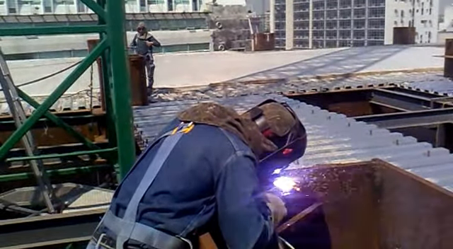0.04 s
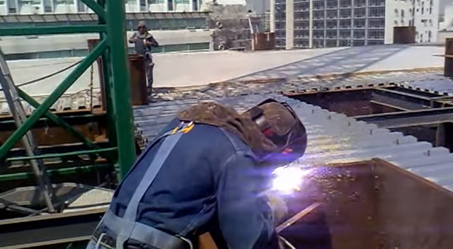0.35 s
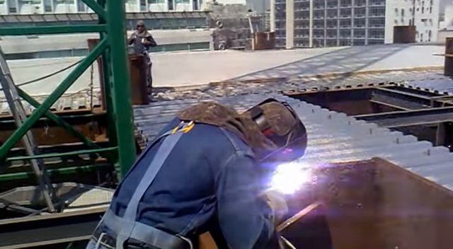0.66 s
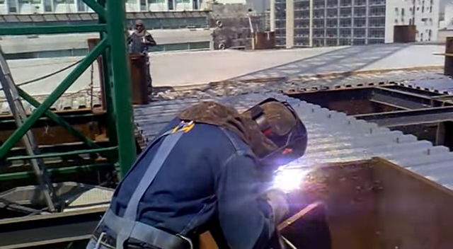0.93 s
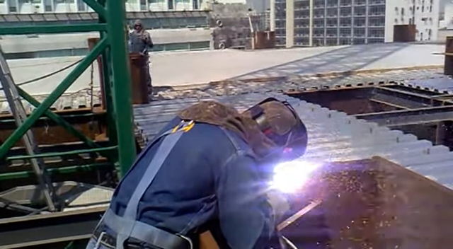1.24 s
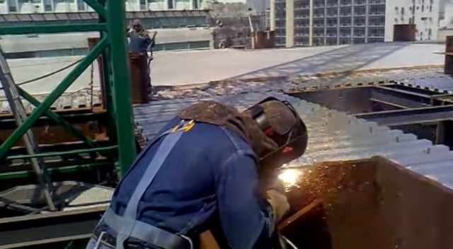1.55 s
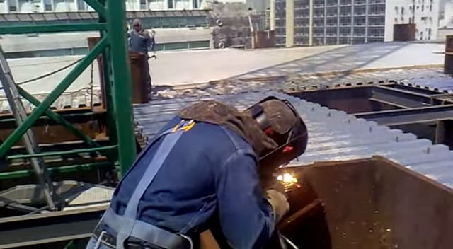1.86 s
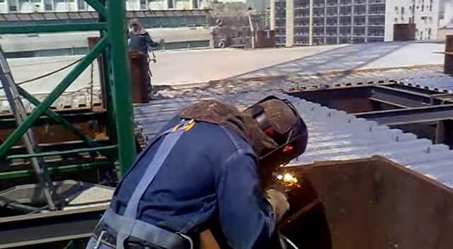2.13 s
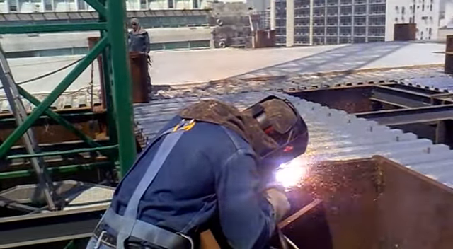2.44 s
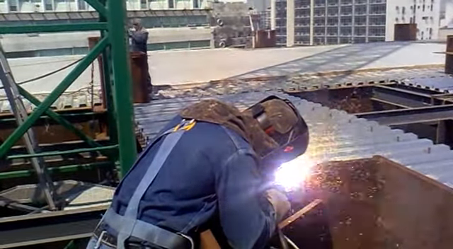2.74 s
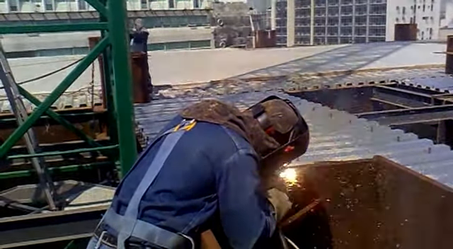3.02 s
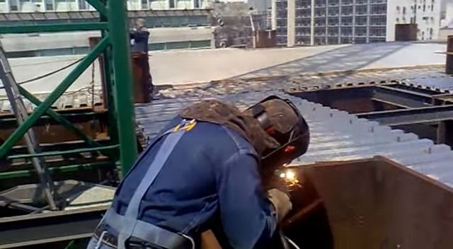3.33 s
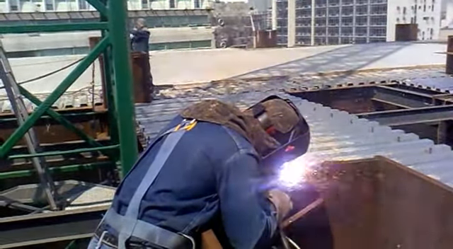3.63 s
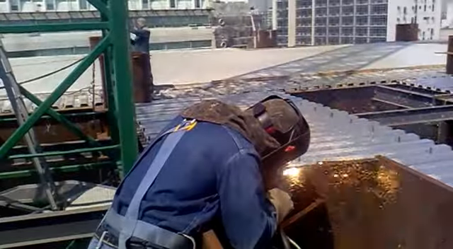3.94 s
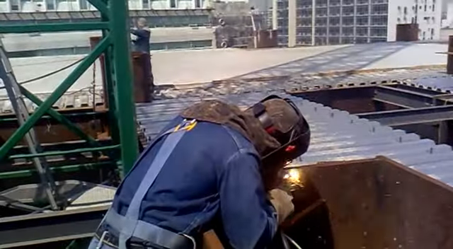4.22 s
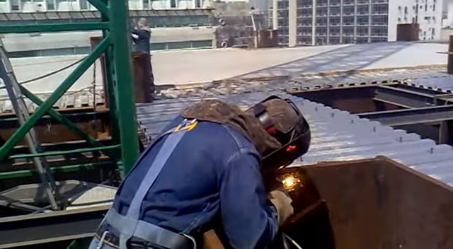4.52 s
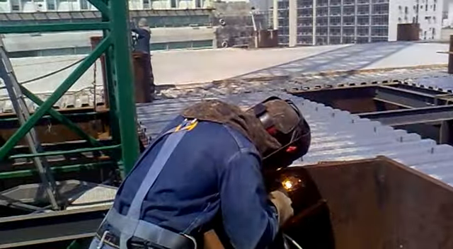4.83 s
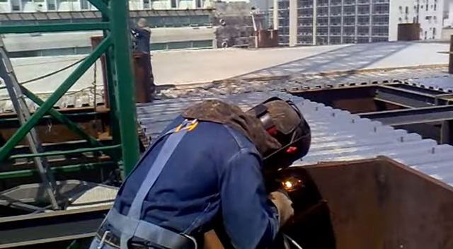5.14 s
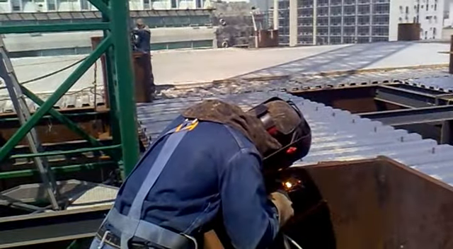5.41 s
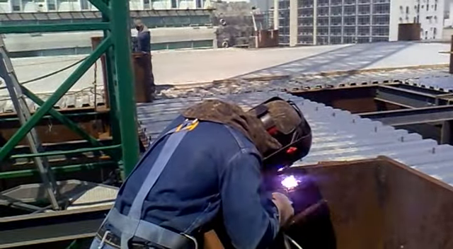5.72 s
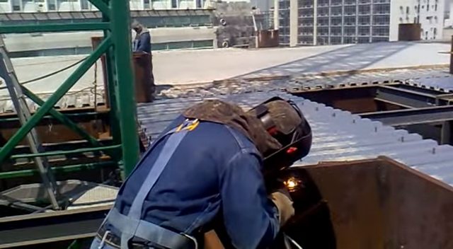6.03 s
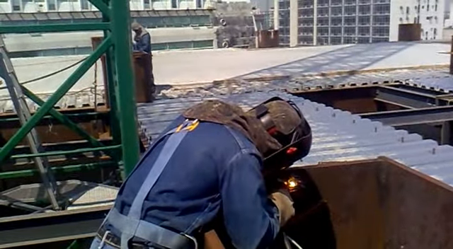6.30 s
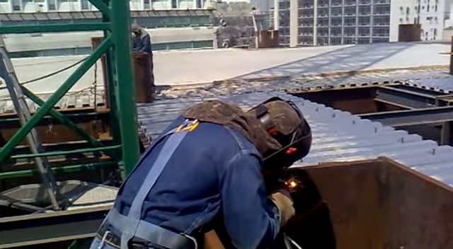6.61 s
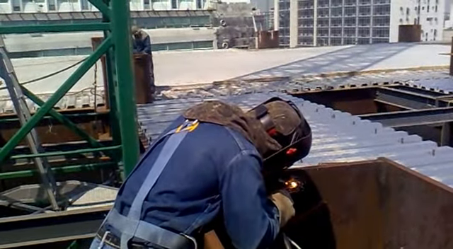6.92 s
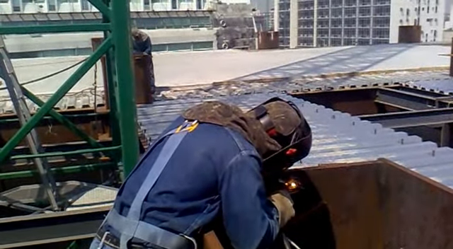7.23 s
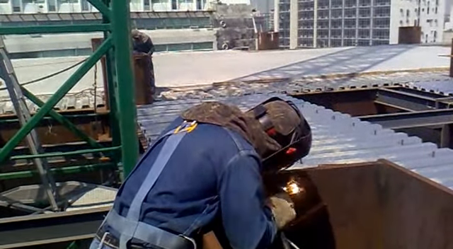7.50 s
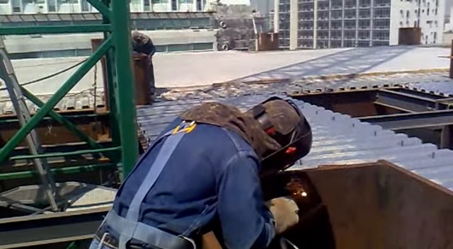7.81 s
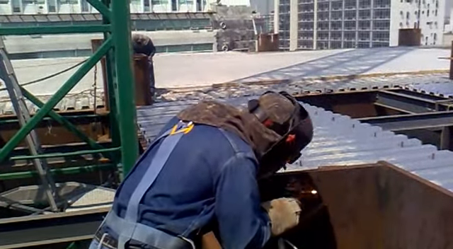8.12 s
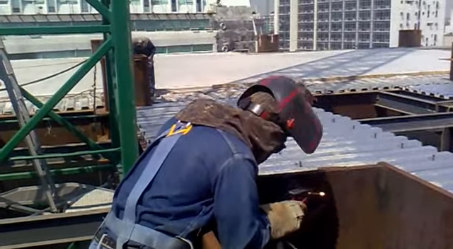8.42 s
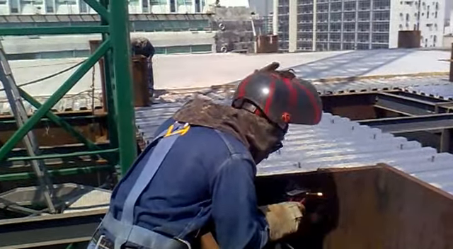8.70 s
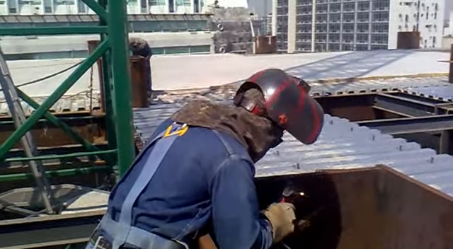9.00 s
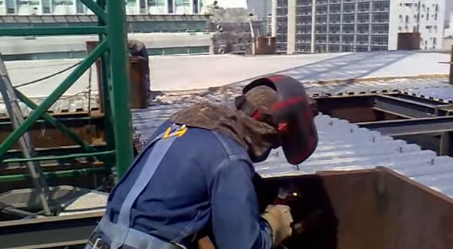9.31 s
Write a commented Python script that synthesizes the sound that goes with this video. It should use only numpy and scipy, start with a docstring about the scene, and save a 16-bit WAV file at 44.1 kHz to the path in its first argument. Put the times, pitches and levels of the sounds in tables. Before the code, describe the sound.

Compressed air hisses over steel above a low, gusty rumble on an open building site. An electric arc roars and sizzles in four long, loud burns, spitting metal and echoing briefly off the buildings. Then the hiss comes back up, and four short strikes snap through it, two ending in dull knocks. Air and rumble carry on to the end. The microphone is close and overloads on the peaks.

```python
"""An electrode gouges a steel column on an open building site, close to an overloading microphone.
From the start, compressed air hisses over the steel above a low, gusty rumble. Until 4.2 s the arc roars
and sizzles in four long burns, darker the deeper it digs, and the buildings throw it back. The hiss, held
down by the recorder's gain control after the loud burns, comes back up. From 6 to 7.8 s come four short
strikes, the second and the last ending in dull knocks. Air and rumble carry on to the end."""
import sys
import numpy as np
from scipy import signal
from scipy.fft import rfft, irfft
from scipy.io import wavfile
from scipy.ndimage import uniform_filter1d

SR = 44100
rng = np.random.default_rng(int(sys.argv[2]) if len(sys.argv) > 2 else 0)


def unload_wav(signal):
    """Save mono or channel-first audio to the path in sys.argv[1] as 16-bit WAV at rate SR, clipped to [-1, 1]."""
    wavfile.write(
        sys.argv[1],
        SR,
        np.round(np.clip(np.atleast_2d(signal).T, -1, 1) * 32767).astype(np.int16),
    )


N = 412335
TIME = np.arange(N) / SR
FREQS = np.fft.rfftfreq(N, 1 / SR)

# heard level of the air as the recorder's gain ducks and recovers: t/s, rush on the steel/dB, hiss/dB
HEARD_AIR = [(0, -32.5, -32.5), (1.9, -28, -29.5), (2.35, -33, -32.5), (3.45, -32.5, -31.5),
             (3.7, -32.5, -34), (4.35, -31.5, -28.5), (4.55, -31.5, -30.5), (4.85, -25, -25),
             (5.38, -24.5, -26), (5.8, -22.5, -23.5), (6.36, -23, -23.5), (6.65, -27.5, -28),
             (7.1, -24, -25), (7.7, -26.5, -26), (7.92, -25.5, -23.5), (8.1, -30, -27.5), (8.42, -30, -25),
             (8.54, -29.5, -30), (8.98, -27, -21), (9.35, -27.5, -27)]


def amp(db):
    """Decibels to gain."""
    return 10 ** (np.asarray(db) / 20)


def unit(x):
    """Scales to rms 1."""
    return x / np.sqrt(np.mean(x ** 2) + 1e-20)


def curve(points, hz):
    """Joins (f/Hz, value) points on a log-frequency axis."""
    f, value = np.transpose(points)
    return np.interp(np.log(hz + 1), np.log(f + 1), value)


def bells(peaks):
    """The dB response of a set of bell-shaped peaks and notches."""
    return sum(db * np.exp(-.5 * ((FREQS - hz) / width) ** 2) for hz, width, db in peaks)


def colour(x, db):
    """Equalises by a dB response; rms 1."""
    return unit(irfft(rfft(x) * amp(db), N))


def below(hz, order):
    """A smooth crossover: 1 under hz, 0 above."""
    return 1 / (1 + (FREQS / hz) ** order)


def wander(rate_hz):
    """Smooth random modulation up to a rate; rms 1."""
    return unit(irfft(rfft(rng.standard_normal(N)) * below(rate_hz, order=4), N))


def resonate(x, hz, width_hz):
    """A resonance of gain 1 that follows the curve hz."""
    turn = np.exp(2j * np.pi * np.cumsum(hz) / SR)
    pole = np.exp(-np.pi * width_hz / SR)
    return 2 * (turn * signal.lfilter([1 - pole], [1, -pole], x / turn)).real


def near_reflections(x, db, sway_s, count):
    """Short paths by plate, visor and glove change as the torch moves, so the colour shifts a little."""
    samples = np.arange(N)
    out = x.copy()
    for delay_s in np.geomspace(.0011, .014, count):
        lag = SR * (delay_s + sway_s * wander(0.73))
        out += amp(db) * rng.choice([-1, 1]) * np.interp(samples - lag, samples, x)
    return out


def steelwork_db():
    """The steelwork stamps the same peaks and notches on air and arc."""
    # f/Hz, half width/Hz, gain/dB
    steel_peaks = [(2030, 90, -3), (2342, 16, 4), (2554, 27, 2.5), (3450, 174, -5), (5460, 120, -5.5),
                   (6106, 130, -6), (6400, 224, 8), (6780, 170, 0), (8160, 380, 11.5), (9170, 200, 5),
                   (11140, 150, -5), (11700, 205, 1.5), (13900, 150, -2), (14800, 166, -13)]
    return bells(steel_peaks)


def gap_resonances():
    """The resonances of the gap between nozzle and steel shift as the torch is moved."""
    # t/s, lower f/Hz, middle f/Hz, middle level/dB, top level/dB
    gap_moves = [(0, 2400, 4290, -3, -7), (1.8, 2400, 4320, -17, -18), (2.4, 2400, 4280, 0.5, -23),
                 (4.4, 2480, 4200, -2, -14), (4.75, 3080, 4100, -8, -17), (5.8, 2850, 4070, 5, -39),
                 (6.7, 2950, 4050, -3, -19), (7.15, 2800, 3900, 2.5, -10), (7.35, 2400, 4080, -1, -7),
                 (7.9, 2600, 4250, -1, -10), (8.2, 2650, 4280, -5, -10.5), (8.67, 2400, 4200, -4, 0),
                 (9.0, 2580, 4400, 2, -34), (9.35, 2680, 4200, -4, 7)]
    t, *columns = np.transpose(gap_moves)
    return [np.interp(TIME, t, column) for column in columns]


def gust_levels(rise_s, fall_s):
    """Gains of rumble and rasp: each gust of the jet rises, holds and dies away."""
    # start/s, length/s, rumble/dB, rasp on the steel/dB
    gusts = [(0.968, 0.15, -31.5, -40), (2.51, 0.63, -34.5, -31), (3.647, 0.086, -32.5, -45),
             (3.768, 0.36, -30.5, -44), (5.539, 0.14, -26, -30), (5.77, 0.34, -31, -38),
             (6.243, 0.1, -31.5, -22), (7.158, 0.62, -33, -30.5), (7.26, 0.078, -27.5, -18.5),
             (7.79, 0.091, -31.5, -25), (8.586, 0.17, -30, -26), (8.86, .4, -34.5, -47)]
    power = np.zeros((2, N))
    for start, length, rumble_db, rasp_db in gusts:
        attack = np.clip((TIME - start) / rise_s, 0, 1)
        release = np.exp(-np.clip((TIME - start - length) / fall_s, 0, 50))
        power += (amp([[rumble_db], [rasp_db]]) * attack * release) ** 2
    return np.sqrt(power)


def rumble(gust_gain, roar_gain):
    """Hollow rumble and site drone dip with the hiss as the recorder's gain moves; arc and gusts
    swell them."""
    # spectra of the rumble and the drone: f/Hz, level/dB
    rumble_eq = [(60, -28), (130, -8.5), (200, -2), (270, -1.5), (350, 2.5), (500, -5.5), (700, -17),
                 (1400, -12), (2200, -13), (3300, -11.5), (6000, -37)]
    drone_eq = [(12, -19), (30, -25), (48, -22), (62, 1), (78, -12), (100, 1), (135, -4), (175, -1.5),
                (260, -17.5), (1000, -13), (4000, -51)]
    # hollow resonances in the gusts: f/Hz, half width/Hz, gain/dB
    hollow_peaks = [(264, 15.5, 5.5), (506, 6.7, 4.5)]
    t, rush_db, _ = np.transpose(HEARD_AIR)
    bed_gain = amp(-36.5 + 0.47 * (np.interp(TIME, t, rush_db) + 24))
    arc_gain = amp(-32) * uniform_filter1d(roar_gain, size=6000)
    gain = np.sqrt(bed_gain ** 2 + arc_gain ** 2 + gust_gain ** 2)
    hollow = colour(rng.standard_normal(N), curve(rumble_eq, FREQS) + bells(hollow_peaks))
    drone = colour(rng.standard_normal(N), curve(drone_eq, FREQS))
    drone_gain = amp(-43.5 + 0.57 * (20 * np.log10(gain) + 45.5))
    return hollow * gain * amp(1.74 + 1.7 * wander(24)) + drone * drone_gain * amp(wander(5.7))


def air_jet(steel_db, rasp_gain):
    """Air hisses out of the nozzle, rushes over the plate and rings in the gap."""
    # spectrum of the jet: f/Hz, level/dB
    air_eq = [(100, -6.5), (600, -12), (1400, -8), (2500, -0.5), (3100, -0.5), (4200, -4.5), (5200, -8),
              (7500, -9.5), (9500, -6), (12700, -4), (14000, -17.5), (15600, -15)]
    tone_db = curve(air_eq, FREQS) + steel_db
    t, rush_db, hiss_db = np.transpose(HEARD_AIR)
    lower_hz, middle_hz, middle_db, top_db = gap_resonances()
    flow = near_reflections(rng.standard_normal(N), db=-16.5, sway_s=.00012, count=6)
    ringing = amp(-14.5) * resonate(flow, lower_hz, width_hz=840)
    ringing += amp(middle_db + 1.5) * resonate(flow, middle_hz, width_hz=200)
    # the top resonances are restless: they swish up and down, come and go
    for hz in (5200, 7460, 9340, 12000):
        ringing += amp(top_db + 3 * wander(5)) * resonate(flow, hz * (1 + .04 * wander(3)), width_hz=300)
    spectrum = rfft(colour(flow + ringing, tone_db))
    low = below(4920, order=4)
    rush_gain = amp(np.interp(TIME, t, rush_db) - 0.35 + 0.59 * wander(30))
    hiss_gain = amp(np.interp(TIME, t, hiss_db) + 0.7 + 0.46 * wander(25))
    rush = unit(irfft(spectrum * low, N))
    hiss = unit(irfft(spectrum * (1 - low), N))
    # gusts rasp on the steel at a lower pitch
    blast = rng.standard_normal(N)
    blast += amp(3) * resonate(blast, hz=np.full(N, 2200), width_hz=320)
    rasp = colour(blast, tone_db - 7 * (1 - low))
    return rush_gain * rush + hiss_gain * hiss + rasp_gain * rasp


def knocks(decay_s, low_cut_hz):
    """The electrode leaves the work with dull knocks, each a few heavily damped cycles."""
    # t/s, level/dB, f/Hz
    hits = [(6.307, -12, 140), (7.793, -16, 170), (7.846, -23, 200)]
    sound = np.zeros(N)
    for t, db, hz in hits:
        age = np.clip(TIME - t, 0, .3)
        sound += amp(db) * np.exp(-age / decay_s) * np.sin(2 * np.pi * hz * age)
    return signal.sosfilt(signal.butter(2, low_cut_hz, "highpass", fs=SR, output="sos"), sound)


def site_echo(x, delay_s, build_s):
    """Scattered reflections from girders and facades, the treble dying first."""
    # colour of the tail: f/Hz, level/dB
    tail_eq = [(300, 3), (1000, -1), (1400, 0.5), (1900, -7.5), (2800, -6.5), (4500, -8), (8000, -13),
               (14000, -9)]
    # decay of the tail: f/Hz, t60/s
    tail_t60 = [(300, 1.04), (1000, 0.79), (2500, 0.59), (8000, 0.53)]
    hz, t, bands = signal.stft(rng.standard_normal(SR), SR, nperseg=256)
    decay = amp(curve(tail_eq, hz)[:, None] - 60 * t / curve(tail_t60, hz)[:, None])
    onset = np.clip((t - delay_s) / build_s, 0, 1)
    tail = signal.istft(bands * decay * onset, SR, nperseg=256)[1]
    return signal.fftconvolve(x, tail / np.linalg.norm(tail))[:N]


def crackle(per_s, spread_db):
    """Tiny bursts of metal: sparse clicks, a few of them large; rms 1."""
    size = amp(spread_db * np.minimum(rng.exponential(1, N), 4))
    return unit(size * rng.choice([-1, 1], N) * (rng.random(N) < per_s / SR))


def sputter(per_s, fall_s):
    """Drops of metal leave at random, each a sudden flare that dies quickly; mean 0, rms 1."""
    drops = rng.exponential(1, N) * (rng.random(N) < per_s / SR)
    flares = signal.lfilter([1], [1, -np.exp(-1 / (fall_s * SR))], drops)
    return unit(flares - flares.mean())


def spits(tone_db, fall_s):
    """The arc snaps and spits molten metal: noise that starts at once, holds and drops away."""
    # t/s, level/dB, hold/s
    snaps = [(1.063, -13, .005), (1.078, -7, 0.0064), (1.096, -7.5, .006), (1.628, -22, 0.0076),
             (1.66, -9, 0.006), (2.55, -26, .03), (3.227, -14, 0.014), (6.247, -11, 0.0068),
             (7.758, -8.5, 0.0017), (7.784, -8, 0.011)]
    gain = np.zeros(N)
    for t, db, hold_s in snaps:
        gain += amp(db) * (TIME >= t) * np.exp(-np.clip((TIME - t - hold_s) / fall_s, 0, 50))
    return gain * colour(rng.standard_normal(N), tone_db)


def arc_levels(burn_rise_s, strike_rise_s, break_s, strike_dig_per_s):
    """Gains of growl, roar and sizzle: the arc catches fast, darkens as it digs in and breaks off."""
    # one curve per long burn: t/s, level/dB, depth (0 on the surface, 1 deep in the groove)
    burns = [
        [(.23, -5.5, 0), (.255, 1, 0.014), (.5, 1, 0.16), (.6, 1, 0.65), (.73, -1, 0.57), (.8, -1, 0.57),
         (.93, -1.5, 1), (1.058, 1.5, .9)],
        [(1.2, -4, .1), (1.225, -1, 0.065), (1.4, 2.5, 0.64), (1.49, 1, 1), (1.62, -.5, 1), (1.68, -7, .8),
         (1.815, -8, 0.24), (1.848, 0.5, 0.82), (1.868, 1.5, 0.93)],
        [(2.515, -10, 0.23), (2.557, 1, 0.99), (2.68, 0, 0.32), (2.84, -2, 0.46), (3.08, 0.5, 0.45),
         (3.17, 0.5, 0.82), (3.238, -0.5, 0.97), (3.249, -8, .9)],
        [(3.772, -13.5, 0), (3.815, -3.5, 0.36), (3.945, -5, 0.47), (3.988, -1, 0.71), (4.074, -4.5, 0.3),
         (4.118, 1, 0.31), (4.17, 0, 0.94)],
    ]
    # short strikes: start/s, end/s, final level/dB, swell/dB, final depth (under 0: above the surface)
    strikes = [(6.011, 6.083, 1.5, 20, .05), (6.2383, 6.258, 1, -1, .55), (7.186, 7.243, -2, 10, -.3),
               (7.749, 7.794, 0.5, 9, 0.31)]
    # growl, roar and sizzle: level on the surface/dB, change at full depth/dB
    voices = [(-28, 10.5), (-15.5, 7), (-9.5, -5)]
    arcs = []
    for points in burns:
        t, level_db, depth = np.transpose(points)
        arcs.append((t[0], t[-1], burn_rise_s, np.interp(TIME, t, level_db), np.interp(TIME, t, depth)))
    for start, end, final_db, swell_db, final_depth in strikes:
        left_s = np.clip(end - TIME, 0, end - start)
        level_db = final_db - swell_db * (left_s / (end - start)) ** 2
        arcs.append((start, end, strike_rise_s, level_db, final_depth - strike_dig_per_s * left_s))
    gains = np.zeros((3, N))
    for start, end, rise_s, level_db, depth in arcs:
        attack = np.clip((TIME - start) / rise_s + .5, 0, 1)
        release = np.exp(-np.clip((TIME - end) / break_s + .5, 0, 50))
        gains += attack * release * amp([level_db + db + deep_db * depth for db, deep_db in voices])
    return gains


def arc(steel_db, growl_gain, roar_gain, sizzle_gain, ripple_hz):
    """Turbulent plasma and tiny bursts of metal, throbbing with the ripple of the rectified supply."""
    # spectrum of the arc: f/Hz, level/dB
    arc_eq = [(150, -29), (600, -19.5), (850, -6), (1300, -10.5), (1700, 0.1), (2500, 0.5), (3100, -0.5),
              (3600, -3), (5000, -11), (7500, -13.5), (9500, -8), (12500, -7), (14000, -18.5),
              (15600, -19.5)]
    # peaks and notches of the groove it burns in: f/Hz, half width/Hz, gain/dB
    groove_peaks = [(1054, 26, 3.5), (1260, 10, 4.5), (1780, 22, 3), (3770, 60, 8.5), (3900, 236, -10.5),
                    (4100, 96, 4), (7470, 100, 9)]
    tone_db = curve(arc_eq, FREQS) + steel_db + bells(groove_peaks)
    plasma = rng.standard_normal(N) + amp(-7) * crackle(per_s=2400, spread_db=4.5)
    plasma = near_reflections(plasma, db=-24, sway_s=.00005, count=8)
    # the arc excites the middle resonance of the gap too
    _, middle_hz, middle_db, _ = gap_resonances()
    plasma += amp(middle_db + 2) * resonate(plasma, middle_hz, width_hz=170)
    spectrum = rfft(colour(plasma, tone_db))
    low, high = below(1584, order=6), 1 - below(3440, order=4)
    growl, roar, sizzle = (unit(irfft(spectrum * band, N)) for band in (low, 1 - low - high, high))
    # a freshly struck arc that sizzles more than it roars is also sharper at the very top
    sharpness_db = 20 * np.log10((sizzle_gain + 1e-6) / (roar_gain + 1e-6))
    top = irfft(rfft(sizzle) * (1 - below(8800, order=10)), N)
    sizzle += (amp(0.57 * sharpness_db - 2) - 1) * top
    # the arc length jitters; the growl follows it most
    ripple = np.sin(2 * np.pi * ripple_hz * TIME + .5 * wander(6))
    jitter_db = 0.37 * ripple + 0.5 * wander(30) + 0.55 * wander(600)
    jitter_db += 0.71 * sputter(per_s=130, fall_s=.003)
    sound = amp(-1 + 1.14 * jitter_db) * growl_gain * growl
    sound += amp(-1.16 + jitter_db) * roar_gain * roar
    sound += amp(1.5 + 0.44 * jitter_db) * sizzle_gain * sizzle
    return sound + spits(tone_db - 9 * high - 4 * low, fall_s=0.0033)


def scene():
    """The arc and its echo over a bed of air and rumble, with knocks; the same in both channels."""
    steel_db = steelwork_db()
    gust_gain, rasp_gain = gust_levels(rise_s=0.027, fall_s=0.1)
    growl_gain, roar_gain, sizzle_gain = arc_levels(
        burn_rise_s=0.011, strike_rise_s=0.001, break_s=0.01, strike_dig_per_s=3.8)
    burning = arc(steel_db, growl_gain, roar_gain, sizzle_gain, ripple_hz=120.7)
    echo = amp(-12.5) * site_echo(burning, delay_s=0.0072, build_s=0.039)
    bed = air_jet(steel_db, rasp_gain) + rumble(gust_gain, roar_gain)
    mix = bed + knocks(decay_s=0.0076, low_cut_hz=120) + echo + burning
    return np.array([mix, mix])


def record(dry):
    """The microphone overloads: the loudest peaks flatten at full scale, then a steep high cut follows."""
    driven = amp(-0.19) * dry
    clipped = driven / (1 + driven ** 8) ** (1 / 8)
    high_cut = signal.firwin(511, 15750, window=("kaiser", 9), fs=SR)
    return signal.oaconvolve(clipped, high_cut[None], "same")


dry = scene()
out = record(dry)
unload_wav(out)
```